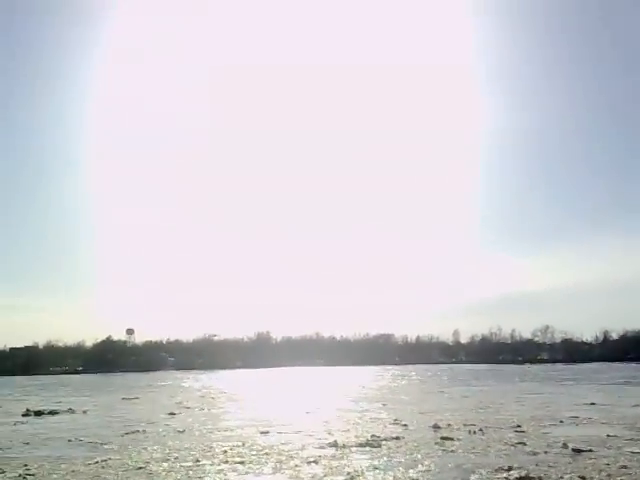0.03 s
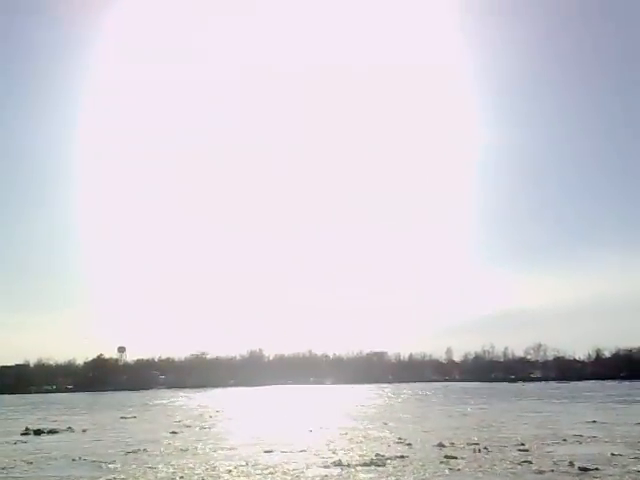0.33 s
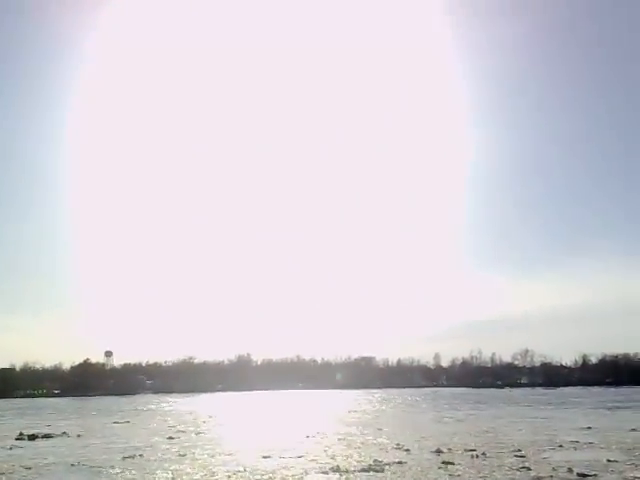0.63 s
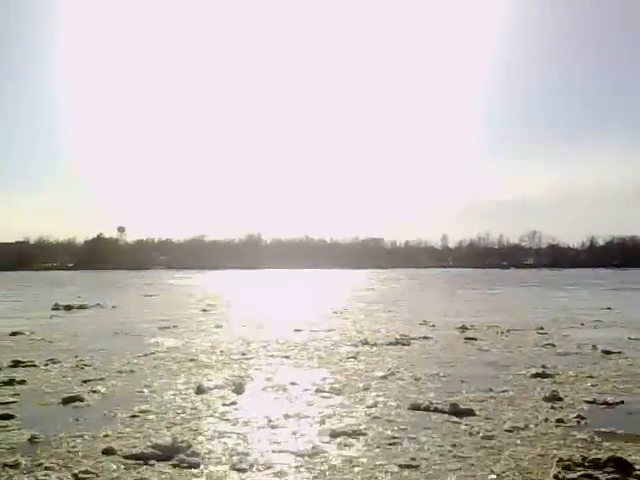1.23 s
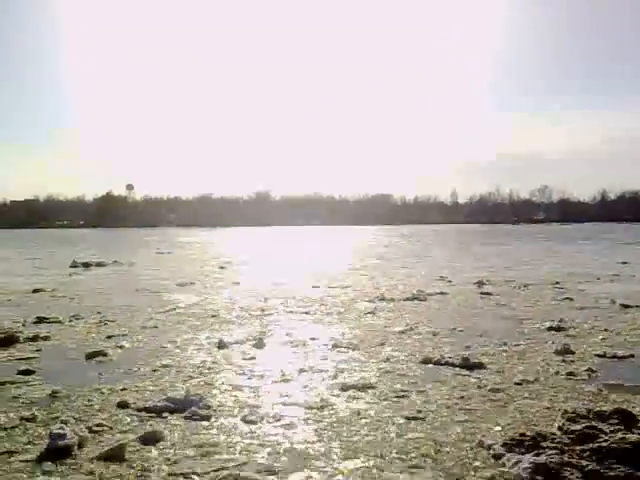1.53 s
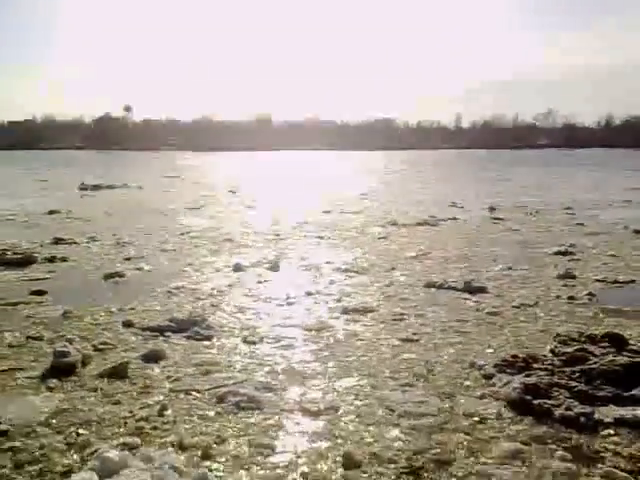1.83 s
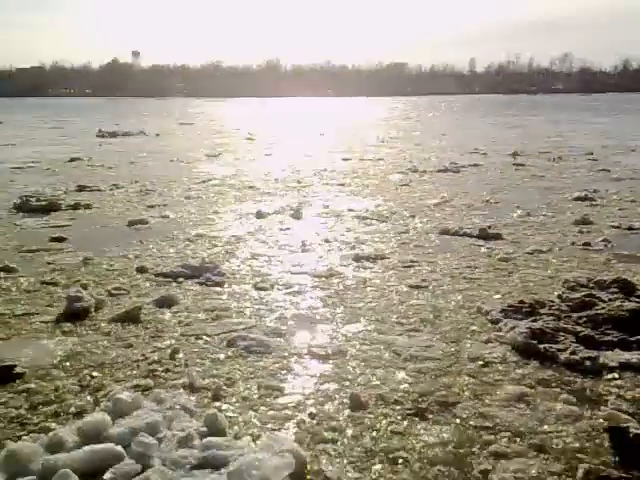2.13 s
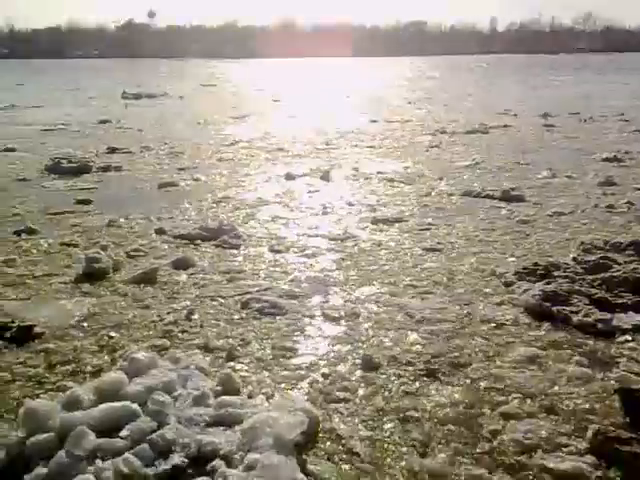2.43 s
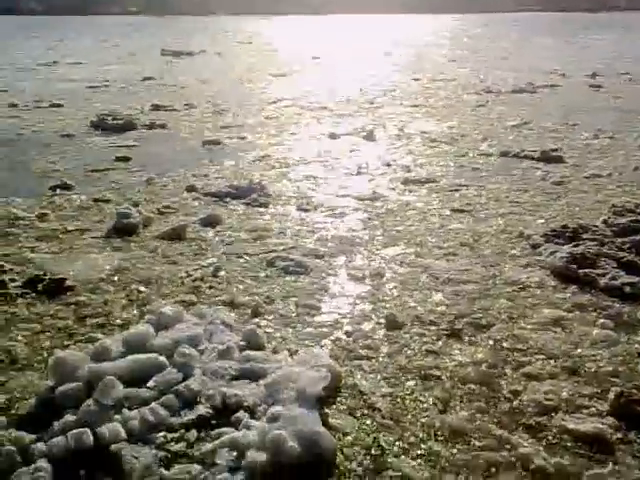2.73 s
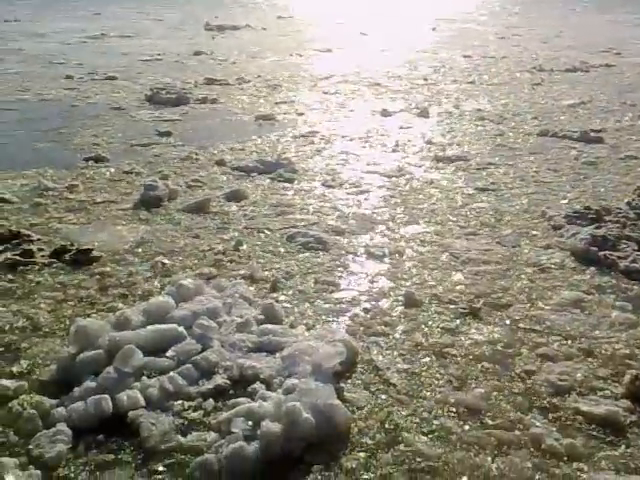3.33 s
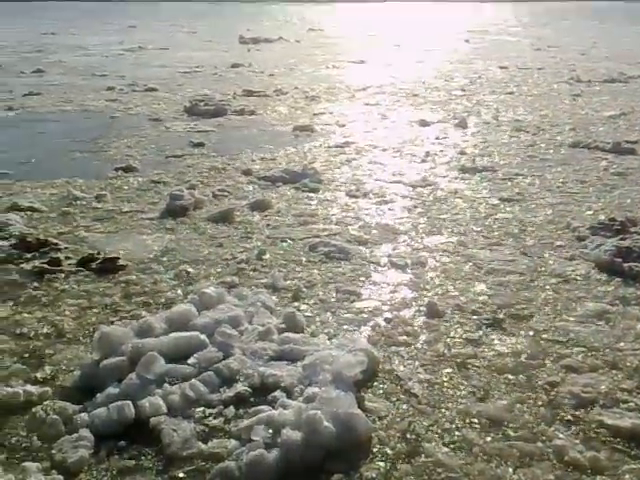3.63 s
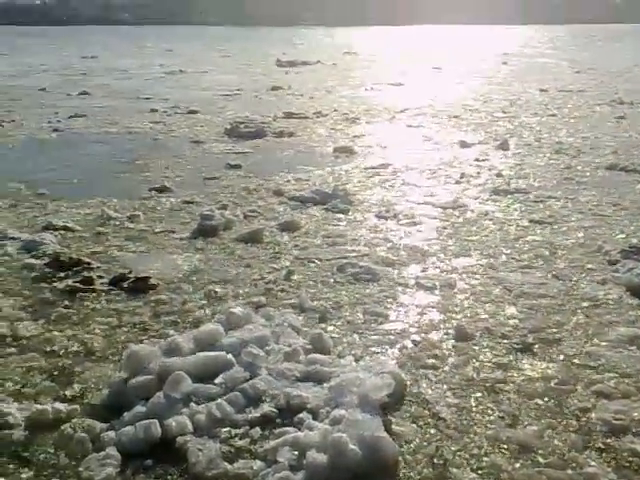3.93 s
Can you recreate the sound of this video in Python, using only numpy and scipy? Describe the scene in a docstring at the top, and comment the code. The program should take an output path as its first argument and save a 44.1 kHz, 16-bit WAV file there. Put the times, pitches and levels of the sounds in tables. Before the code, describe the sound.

Wind rumbles and thumps on the microphone from the start, over the steady hiss of icy slush on an open lake and occasional tiny clinks of ice. A faint, short whistle sounds far off at about 0.8 seconds. The gusts ease after about 2.3 seconds while the hiss grows louder and brighter. Near 3.4 seconds the slush sizzles softly, and a few more shards tinkle until 4 seconds.

```python
"""A lake of icy slush on a windy day, heard from the shore through one small microphone.
From the start, eddies rumble and thump on the microphone, over the hiss of countless jostling
ice crumbs and the odd tinkle of a shard close by. Just before one second, something far off gives
a faint, short whistle. Then the microphone tilts down to the near slush: the hiss grows and
brightens while the wind eases, and near the end a patch of slush settles with a soft sizzle."""
import sys
import numpy as np
from scipy import signal
from scipy.fft import rfft, irfft, next_fast_len
from scipy.io import wavfile
from scipy.ndimage import uniform_filter1d, map_coordinates

SR = 44100
rng = np.random.default_rng(int(sys.argv[2]) if len(sys.argv) > 2 else 0)


def master_out(mix):
    """Clip the mix to full scale and print it as 16-bit PCM to the path in sys.argv[1]."""
    frames = np.transpose(np.atleast_2d(mix))
    ceiling = np.clip(frames, -1, 1)
    pcm = np.round(ceiling * 32767).astype(np.int16)
    wavfile.write(sys.argv[1], SR, pcm)


N = 176400
TIME = np.arange(N) / SR
TOP_HZ = 15750


def amp(db):
    """Decibels to gain."""
    return 10 ** (np.asarray(db) / 20)


def unit(x):
    """Scale to rms 1."""
    return x / np.sqrt(np.mean(x ** 2) + 1e-20)


def curves(rows):
    """One value per sample for each column after the time."""
    times, *columns = np.transpose(rows)
    return [np.interp(TIME, times, column) for column in columns]


def swell(centre_s, half_width_s):
    """A bell-shaped envelope."""
    return np.exp(-2 * ((TIME - centre_s) / half_width_s) ** 2)


def wobble(knots_per_s):
    """A smooth random curve."""
    return map_coordinates(rng.standard_normal(1024), [TIME * knots_per_s], mode="wrap")


def filtered(x, response):
    """Filter x by a gain that depends on frequency."""
    size = next_fast_len(N + SR // 2)
    return irfft(rfft(x, size) * response(np.fft.rfftfreq(size, 1 / SR)), size)[:N]


def coloured(x, spectrum):
    """x shaped by (Hz, dB) points, at rms 1."""
    points_hz, db = np.transpose(spectrum)
    return unit(filtered(x, lambda hz: amp(np.interp(np.log(hz + 1), np.log(points_hz), db))))


def rush(spectrum, patchy_db):
    """Noise with drifting patches of random gain."""
    bins = signal.stft(rng.standard_normal(N), nperseg=512)[2]
    patches = uniform_filter1d(rng.standard_normal(bins.shape), size=4, axis=0)
    patches = unit(uniform_filter1d(patches, size=12, axis=1))
    noise = signal.istft(bins * amp(patchy_db * patches))[1][:N]
    return coloured(noise, spectrum)


def eddies(spectrum, even_s):
    """Turbulent pressure whose strength is even over spans longer than even_s."""
    pressure = coloured(rng.standard_normal(N), spectrum)
    power = np.abs(uniform_filter1d(pressure ** 2, max(int(even_s * SR), 2)))
    return coloured(pressure / np.sqrt(power + .02), [(2000, 0), (4000, -30)])


# The air over the lake. Each row: frequency in Hz, relative level in dB.
AIR_SPECTRUM = [(12, -13), (30, -2), (42, 6), (62, 4), (88, -13), (115, -5), (150, -14), (200, -34),
                (600, -72)]

def open_air(level_db=-36.5):
    """Moving air keeps up a deep, steady rumble all along the shore."""
    return amp(level_db) * eddies(AIR_SPECTRUM, even_s=0.13)


def far_whistle(centre_s=0.79, pitch_hz=1780, sag_hz_per_s=390, peak_db=-37.5):
    """One faint whistle far from the microphone, perhaps a bird, sagging slightly."""
    hz = pitch_hz - sag_hz_per_s * (TIME - centre_s) + 12 * wobble(119.5)
    tone = np.sin(2 * np.pi * np.cumsum(hz) / SR)
    return amp(peak_db) * swell(centre_s, half_width_s=0.048) * tone


# Wind on the microphone, between gusts. Each row: time in seconds, rumble level in dB.
WIND_LEVELS = [(0, -20.5), (.5, -20.5), (.57, -26.5), (.95, -26.5), (1.4, -27.5), (1.75, -29),
               (1.95, -23.5), (2.32, -26.5), (2.38, -35.5), (2.52, -36.5), (2.6, -30), (2.72, -36),
               (2.82, -31), (3.18, -29.5), (3.38, -35.5), (3.62, -30.5), (3.8, -34), (4, -32.5)]
# Gusts that strike it. Each row: centre and half-width in seconds, rumble and flutter levels in dB.
MIC_GUSTS = [(0.034, 0.019, -16, -25), (0.189, 0.053, -22, -21), (.296, 0.014, -17.5, -17),
             (0.365, 0.036, -26, -23.5), (0.409, 0.021, -14.5, -20.5), (0.502, 0.09, -23, -27.5),
             (0.673, 0.0095, -13.5, -32), (0.781, 0.028, -23.5, -27.5), (.853, 0.0088, -30, -16.5),
             (0.928, 0.039, -17.5, -26), (0.965, 0.019, -25, -22), (1.085, 0.075, -25, -31.5),
             (1.162, 0.02, -24.5, -25.5), (1.282, 0.057, -17, -31), (1.391, 0.0085, -18.5, -32),
             (1.477, 0.027, -21, -30.5), (1.541, 0.02, -23, -21), (1.701, 0.04, -25, -35),
             (1.84, 0.018, -20.5, -34), (1.911, 0.0092, -24, -28), (2.017, 0.021, -23, -28),
             (2.146, 0.059, -20.5, -20), (2.209, 0.041, -21, -27), (2.319, 0.032, -23, -27),
             (3.016, 0.02, -23.5, -45)]
# Large, small and smallest eddies at the microphone. Each row: frequency in Hz, relative level in dB.
RUMBLE_SPECTRUM = [(12, -8), (28, -9), (40, -5.5), (50, -5.5), (70, 3), (88, -1.5), (115, 2), (145, -3.5),
                   (190, -7.5), (250, -13), (350, -26.5), (600, -47), (1500, -90)]
FLUTTER_SPECTRUM = [(60, -13), (140, -2), (195, 2.5), (245, -1), (295, 1), (350, -6.5), (430, -8.5),
                    (550, -18), (750, -33), (1200, -31.5), (3000, -61)]
RASP_SPECTRUM = [(250, -16), (450, 0.5), (600, 0.5), (800, -3.5), (1100, -19), (2500, -42)]

def wind_on_mic(breeze_db=-24, breeze_flutter_db=-36, hard_flutter_db=-19, full_rasp_db=-34.5):
    """Large eddies rumble, small ones flutter in strong wind, and the hardest gusts rasp."""
    wind_db, = curves(WIND_LEVELS)
    lumps = wobble(31.97)
    rumble_power = amp(wind_db + 1.78 * lumps) ** 2
    flutter_db = breeze_flutter_db + 1.62 * (wind_db - breeze_db)  # grows faster than the rumble
    flutter_power = amp(flutter_db + 2.4 * lumps + 2.6 * wobble(60)) ** 2
    for centre_s, half_width_s, gust_rumble_db, gust_flutter_db in MIC_GUSTS:
        gust = swell(centre_s, half_width_s)
        rumble_power += (amp(gust_rumble_db) * gust) ** 2
        flutter_power += (amp(gust_flutter_db) * gust) ** 2
    hardness = np.minimum(flutter_power / amp(hard_flutter_db) ** 2, 1)
    rasp = amp(full_rasp_db) * hardness * eddies(RASP_SPECTRUM, even_s=.02)
    rumble = np.sqrt(rumble_power) * eddies(RUMBLE_SPECTRUM, even_s=0.0513)
    flutter = np.sqrt(flutter_power) * eddies(FLUTTER_SPECTRUM, even_s=0.0335)
    return rumble + flutter + rasp


# Single eddies right on the microphone. Each row: centre in seconds, peak in dB, strongest frequency in Hz.
EDDY_SLAPS = [(0.177, -20, 480), (0.404, -18, 90), (.418, -7, 284), (0.464, -17, 217), (.491, -16, 200),
              (.513, -12, 230), (.675, -16, 200), (.782, -16, 110), (0.907, -17, 277), (0.922, -18.5, 149),
              (1.459, -18, 228), (1.536, -15, 210), (1.591, -12.5, 100), (1.612, -18, 302),
              (2.112, -13, 248), (2.143, -27, 400), (2.272, -16, 110), (2.337, -17.5, 190),
              (3.079, -17, 101)]

def eddy_slaps():
    """A vortex passes the microphone port: one push and pull, the quicker the smaller it is."""
    out = np.zeros(N)
    for centre_s, peak_db, hz in EDDY_SLAPS:
        passage = 2 * np.pi * hz * (TIME - centre_s)
        out -= amp(peak_db) * passage * np.exp((1 - passage ** 2) / 2)
    return out


# Shards clinking close to the microphone. Each row: start in seconds, pitch in Hz, ring level in dB,
# seconds for the ring to fall 60 dB, snap level over the ring in dB.
NEAR_SHARDS = [(.11, 4300, -38, .057, -6), (.215, 11700, -54, .09, -8), (.905, 11500, -55, .06, 0),
               (.938, 7700, -48, 0.054, -2), (1.081, 9700, -47.5, 0.042, -4), (1.215, 4500, -42, 0.054, -2),
               (1.261, 7900, -53, .06, 0), (1.473, 4370, -38, .055, -5), (1.881, 10500, -50, .035, 0),
               (1.961, 4800, -40.5, .07, -2), (2.686, 13000, -51, .03, 4), (2.953, 11900, -46, .05, 2),
               (3.309, 14000, -48, .05, 8), (3.33, 2280, -30, 0.067, -10), (3.488, 7360, -33.5, 0.037, -6),
               (3.552, 9400, -43, .04, -5), (3.764, 12600, -45, .045, -8), (3.977, 8100, -36, 0.035, -7),
               (3.994, 8300, -26.5, 0.058, -6)]

def near_shards(ring_width=0.04, snap_octaves=0.67, snap_t60_s=0.039, attack_s=0.0014):
    """Each ice shard snaps in a broad band and rings briefly in a narrow one."""
    out = np.zeros(N + SR)
    t = np.arange(SR // 8) / SR
    hz = np.fft.rfftfreq(len(t), 1 / SR)
    attack = 1 - np.exp(-t / attack_s)
    for start_s, pitch_hz, ring_db, t60_s, snap_db in NEAR_SHARDS:
        ring_bins, snap_bins = rfft(rng.standard_normal((2, len(t))))
        ring_bins /= 1 + ((hz / pitch_hz - 1) / ring_width) ** 2
        snap_bins /= 1 + (np.log2((hz + 1) / pitch_hz) / snap_octaves) ** 2
        ring = unit(irfft(ring_bins, len(t))) * amp(-60 * t / t60_s)
        snap = unit(irfft(snap_bins, len(t))) * amp(-60 * t / snap_t60_s)
        out[round(start_s * SR):][:len(t)] += amp(ring_db) * attack * (ring + amp(snap_db) * snap)
    return out[:N]


def ice_crumbs(count=6000, per_s=900, median_hz=6580, decay_cycles=8.7, cap_db=5):
    """Ice crumbs touch at random, each with a tiny damped ring, a few stronger than the rest."""
    gaps, strength_db = -np.log(1 - rng.random((count, 2)).T)  # exponential draws
    start_s = np.cumsum(gaps) / per_s
    hz = np.clip(median_hz * np.exp(0.507 * rng.standard_normal(count)), 1500, TOP_HZ)
    strength = amp(np.minimum(strength_db, cap_db))
    samples = np.arange(400)
    cycles = hz[:, None] * samples / SR
    rings = strength[:, None] * np.sin(2 * np.pi * cycles) * np.exp(-cycles / decay_cycles)
    positions = (start_s * SR).astype(int)[:, None] + samples
    return unit(np.bincount(positions.ravel(), rings.ravel(), N)[:N])


# The lake from the shore. Each row: time in seconds, relative levels of wash and fizz in dB.
SLUSH_LEVELS = [(0.03, -37.5, -54.5), (0.65, -39.5, -57.5), (0.71, -39, -58), (0.76, -39.5, -61),
                (0.95, -38.5, -54), (0.98, -39.5, -59), (2.05, -38, -55), (2.35, -39, -58.5),
                (2.83, -36.5, -51.5), (2.86, -35.5, -49), (3.02, -35.5, -50.5), (3.42, -36.5, -49),
                (3.48, -37, -49), (3.49, -37.5, -49), (3.52, -36, -49.5), (3.96, -35.5, -48.5)]
# Wash from far out, slush at the shore, the fizz on top, and a near patch settling.
# Each row: frequency in Hz, relative level in dB.
WASH_SPECTRUM = [(100, -28), (300, 1.5), (500, -6.5), (700, -0.5), (1100, -1.5), (1450, 0.5), (1800, -2.5),
                 (2300, -1), (2650, -3.5), (3000, -8), (3700, -8.5), (5000, -16.5), (7000, -26.5),
                 (10000, -39.5), (16000, -59)]
SHORE_SPECTRUM = [(200, -13), (450, -4.5), (750, -3), (1400, -4.5), (2200, -4.5), (3200, -10.5),
                  (6000, -58)]
FIZZ_SPECTRUM = [(1000, -4), (3000, -7), (5000, -1.5), (6000, -0.5), (6800, 0), (7600, -1), (8800, -5.5),
                 (11500, -4.5), (13500, -7.5), (15700, -11.5)]
SETTLING_SPECTRUM = [(4500, -20), (5700, -7), (6500, -1), (7500, -2), (8500, -9), (11000, -28)]

def slush(tilt_start_s=1.67, tilt_end_s=3.3, shore_db=-38, settling_db=-50.5):
    """Jostling ice blurs into a wash far out; the near slush comes in as the microphone tilts down."""
    wash_db, fizz_db = curves(SLUSH_LEVELS)
    tilt = np.clip((TIME - tilt_start_s) / (tilt_end_s - tilt_start_s), 0, 1)
    wash_gain = amp(wash_db + 1 - 1.8 * tilt + 0.34 * wobble(5.25))
    wash = wash_gain * rush(WASH_SPECTRUM, patchy_db=0.73)
    shore = amp(shore_db) * tilt * rush(SHORE_SPECTRUM, patchy_db=1.0)
    fizz = amp(0.5) * rush(FIZZ_SPECTRUM, patchy_db=1.5)
    crackle = amp(-3) * coloured(ice_crumbs(), FIZZ_SPECTRUM)
    settling = amp(settling_db) * swell(centre_s=3.41, half_width_s=0.27)
    sizzle = settling * coloured(ice_crumbs(), SETTLING_SPECTRUM)
    fizz_gain = amp(fizz_db + 0.44 * wobble(25.14))
    return wash + shore + sizzle + fizz_gain * (fizz + crackle)


def scene():
    """An open shore with no echoes; everything reaches one microphone."""
    return (open_air() + wind_on_mic() + eddy_slaps() + slush() + near_shards() + far_whistle())[None]


def record(dry):
    """The recorder keeps nothing above its band limit."""
    return filtered(dry[0], lambda hz: hz < TOP_HZ)[None]


dry = scene()
out = record(dry)
master_out(out)
```